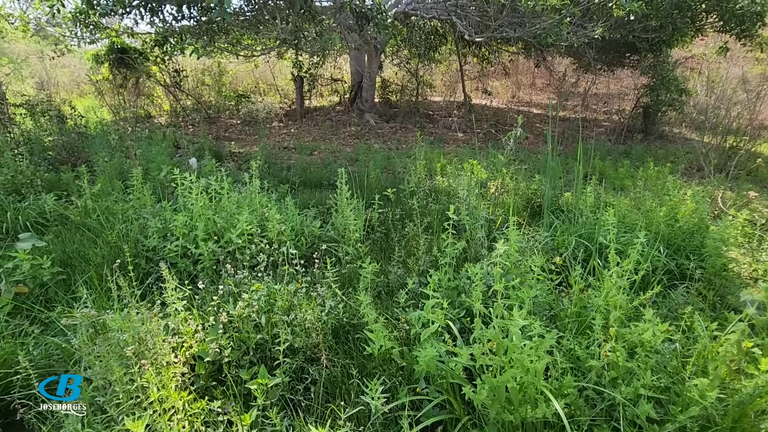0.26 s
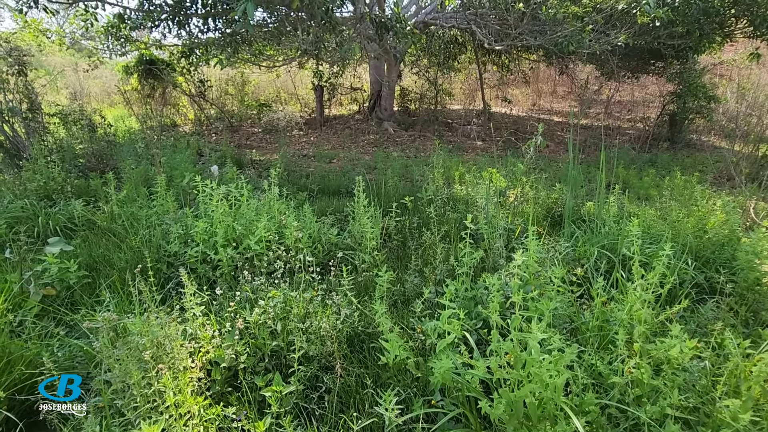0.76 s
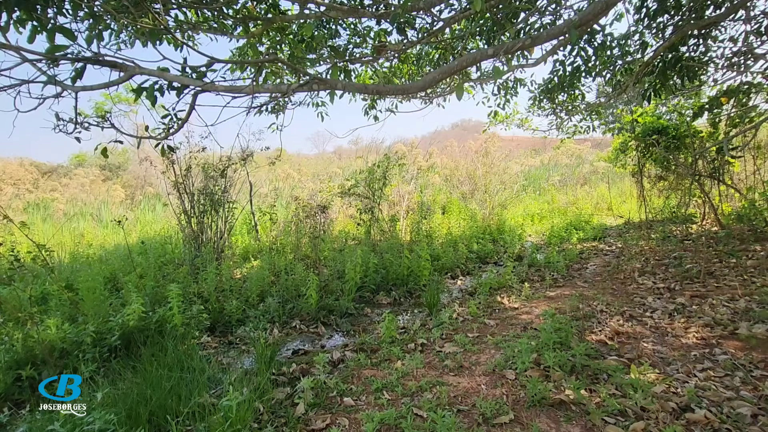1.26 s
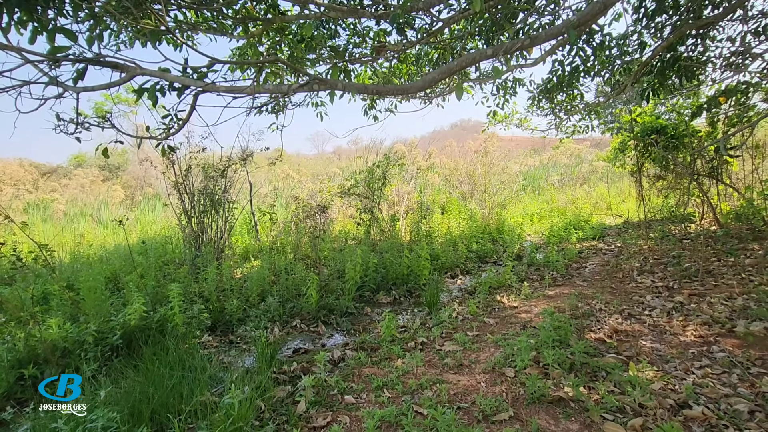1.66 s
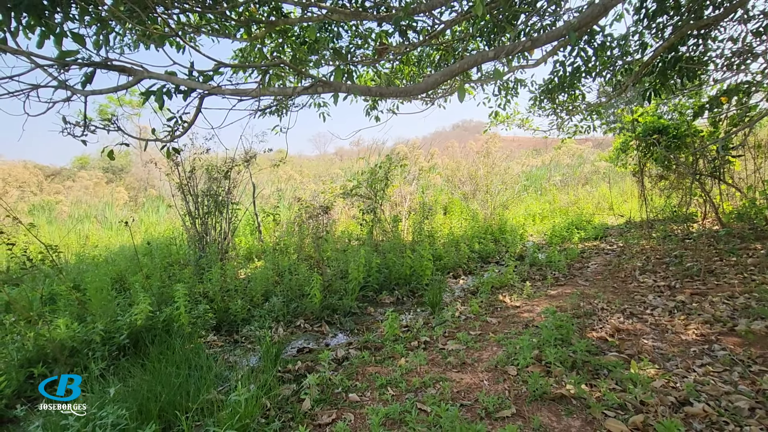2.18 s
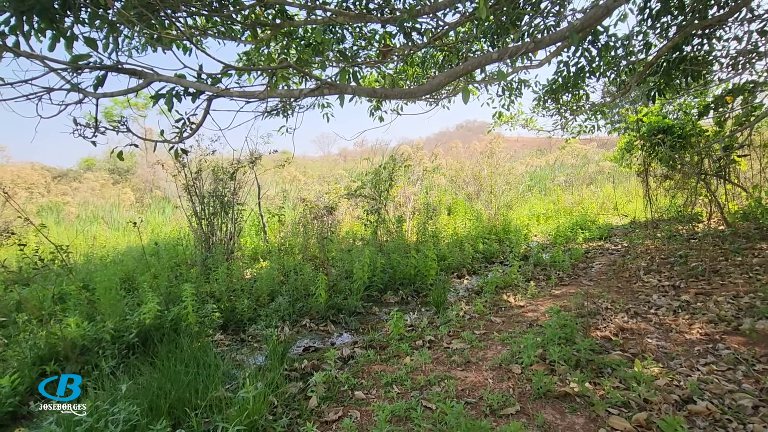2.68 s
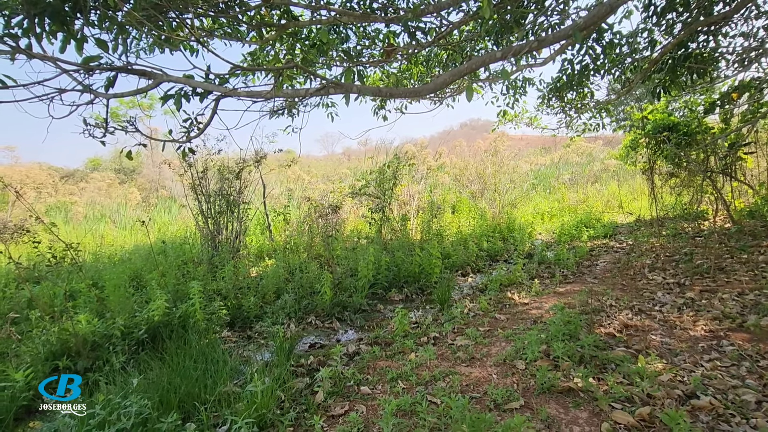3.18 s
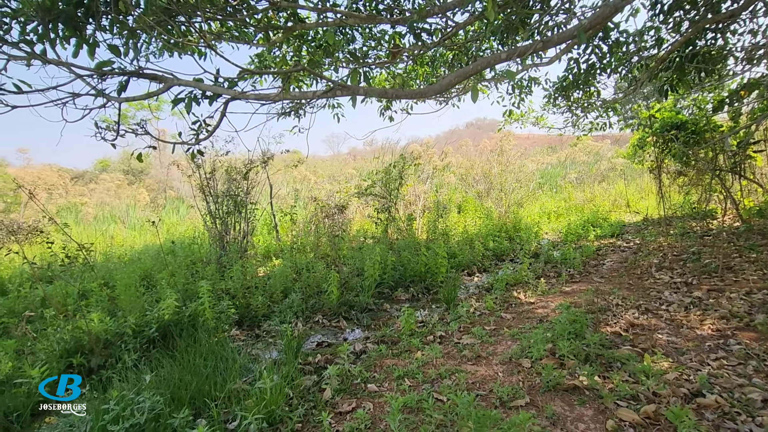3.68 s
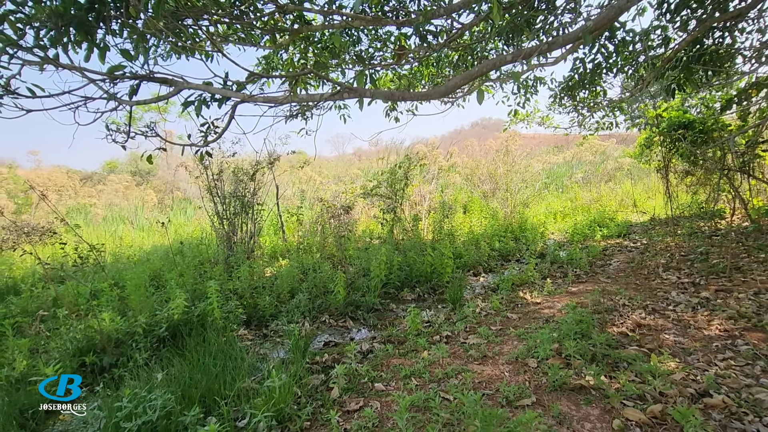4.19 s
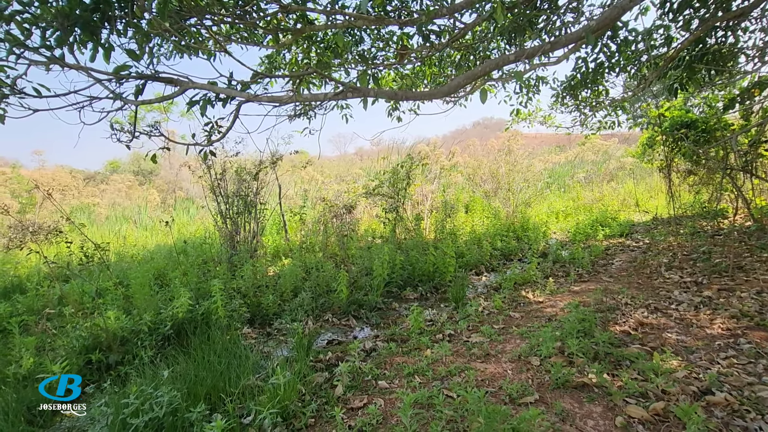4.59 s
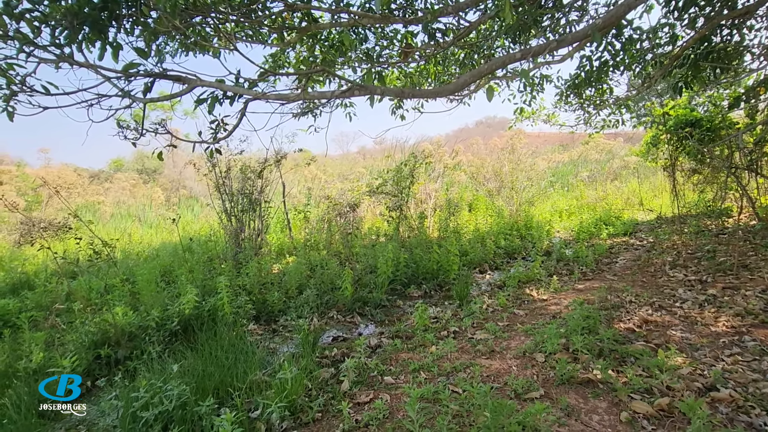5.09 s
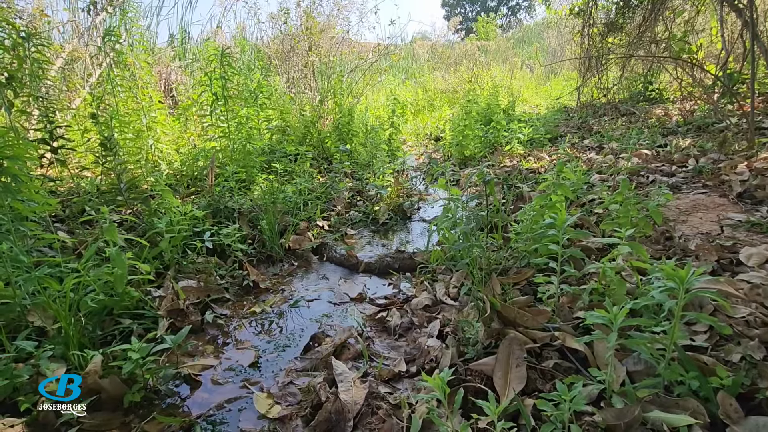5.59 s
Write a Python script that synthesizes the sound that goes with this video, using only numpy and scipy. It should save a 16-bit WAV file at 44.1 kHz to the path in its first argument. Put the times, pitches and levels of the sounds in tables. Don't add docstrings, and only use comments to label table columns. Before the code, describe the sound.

Three abrupt outdoor shots share a continuous cricket chorus. First, trills with climbing starts sound over a far road rumble and soft wind buffeting. Next, quieter ground noise exposes a piercing, almost continuous high cricket, clear trills from the left and a rougher chirper near the centre, with scattered leaf crackles to the right. Finally, close by wet ground, twigs tick, leaves crunch and a foot thuds into mud with tiny bubbles. Open air, wide stereo camera microphone.

```python
import sys
import numpy as np
from scipy import signal
from scipy.fft import rfft, irfft, next_fast_len
from scipy.io import wavfile
from scipy.ndimage import uniform_filter1d, map_coordinates

SR = 44100
rng = np.random.default_rng(int(sys.argv[2]) if len(sys.argv) > 2 else 0)


def attenuation_scalar(level_db):
    decades = np.asarray(level_db, float) / 20
    return 10 ** decades


def pcm_store(signal):
    levels = np.round(np.clip(np.atleast_2d(signal), -1, 1) * 32767)
    wavfile.write(sys.argv[1], SR, levels.astype(np.int16).T)


N = 257984
TIME = np.arange(N) / SR

CUTS = [0, 1.292, 5.288, 5.86]
HIGH_RATE = (62.84, 62.74)
HIGH_STARTS = (.0189, 1.3148, 3.5462, 4.3432)
HIGH_LENGTHS = (2.223, .789, 1)
CLEAR_RATES = (38, 35.3)
DOUBLE_RATE = 31.3


def unit(x):
    return x / np.sqrt(np.mean(x ** 2) + 1e-20)


def along(points, hz):
    f, v = np.transpose(points)
    return np.interp(np.log(hz + 1), np.log(f + 1), v)


def curves(rows):
    s, *columns = np.transpose(rows)
    return [np.interp(TIME, s, column) for column in columns]


def wobble(rate):
    return map_coordinates(rng.standard_normal(size=4000), [TIME * rate])


def filtered(x, response):
    m = next_fast_len(x.shape[-1] + 8192)
    return irfft(rfft(x, m) * response(np.fft.rfftfreq(m, 1 / SR)), m)[..., :x.shape[-1]]


def sides(pan_db):
    left, right = attenuation_scalar(pan_db / 2), attenuation_scalar(-pan_db / 2)
    return np.sqrt(2) * np.array([left, right]) / np.hypot(left, right)


def lagged(pair, lag):
    return np.array([np.roll(pair[0], round(lag)), pair[1]])


def rush(spectrum, alike, patchy_db, size=N):
    z = signal.stft(rng.standard_normal((2, size + 512)), nperseg=512)[2]
    field = uniform_filter1d(rng.standard_normal(z.shape[1:]), size=5, axis=0)
    field = uniform_filter1d(field, size=8, axis=1)
    pair = signal.istft(z * attenuation_scalar(patchy_db * unit(field)), nperseg=512)[1][:, :size]

    def response(hz):
        coherence = along([(100, 0.91), (900, alike), (4000, alike / 2)], hz)
        angle = np.arccos(np.clip(coherence, 0, 1)) / 2
        return attenuation_scalar(along(spectrum, hz)) * [np.cos(angle), np.sin(angle)]

    mid, side = filtered(pair, response)
    return unit(np.array([mid + side, mid - side]))


def swells(rows, rest_db):
    gain = attenuation_scalar(rest_db)
    for s, db, rise, fall in rows:
        distance = np.maximum((s - TIME) / rise, (TIME - s) / fall)
        gain = gain + attenuation_scalar(db - 25 * distance.clip(0, 8))
    return gain


def shot(s):
    return int(np.searchsorted(CUTS, s)) - 1


def stop(s, length):
    return min(s + length, CUTS[shot(s) + 1] - .006, TIME[-1])


def phrases(singers):
    rows = []
    for (rate, hz, sag, pan_db, turn), songs in singers:
        for s, length, db in songs:
            since = s - CUTS[shot(s)]
            rows.append((s, stop(s, length), rate, hz - sag * since, db, pan_db + turn * since, 0))
    return rows


def trill(rows, duty, arch_hz, slope_hz, dip, lean, scatter_db, loose_hz, octave_db):
    out = np.zeros((2, N))
    drift_hz = 14 * wobble(1.3)
    for first, end, rate, hz, db, pan_db, climb_hz in rows:
        last_edge = first + (np.floor((end - first) * rate) + .5) / rate
        span = slice(max(0, round((first - .5 / rate) * SR)), round(last_edge * SR))
        t = TIME[span] - first
        stroke = np.floor(t * rate + .5).astype(int).clip(0)
        size, phase, detune = rng.standard_normal((400, 3))[stroke].T
        u = np.clip((t * rate - stroke) / duty, -.5, .5)
        shape = np.cos(np.pi * u) ** 0.5 * (1 - dip * np.exp(-(u / 0.16) ** 2)) * np.exp(-lean * u)
        pitch = hz + drift_hz[span] + arch_hz * np.cos(2 * np.pi * u) / 2
        pitch += loose_hz * detune - slope_hz * u
        cold = np.exp(-(t / .09) ** 2)
        pitch -= climb_hz * cold
        shape *= attenuation_scalar(-.045 * climb_hz * cold)
        angle = 2 * np.pi * np.cumsum(pitch) / SR + phase * loose_hz / 12
        tone = unit(shape * (np.sin(angle) + attenuation_scalar(octave_db) * np.sin(2 * angle)))
        out[:, span] += attenuation_scalar(db + scatter_db * size) * tone * sides(pan_db)[:, None]
    return out


def ground_noise(k, t, gust, alike, lag):
    # f/Hz, density/dB
    ground = [
        [(13, -55), (22, -20), (49, -3), (69, -0.5), (190, -13.5), (241, -28), (366, -24), (498, -17.5),
         (863, -11.5), (1230, -27), (1630, -30), (3230, -40.5), (3850, -42), (4200, -37), (5460, -70),
         (9240, -120)],
        [(13, -24), (22, 3.5), (53, -2), (86, -1), (146, -6.5), (328, -20.5), (418, -15), (1080, -20.5),
         (1950, -17), (3520, -24), (4200, -24.5), (5460, -64), (9240, -120)],
        [(13, -33), (22, 7.5), (107, 2), (149, 2), (221, -5), (328, -4.5), (409, -6.5), (985, -11),
         (1710, -9.5), (1860, -7), (4200, -14), (5460, -48), (9240, -120)],
    ]
    rumble = [
        (-48, -0.23),
        (-66, -0.4),
        (-65, 8.5),
    ]
    start_db, drift_db = rumble[k]
    noise = lagged(rush(ground[k], alike, patchy_db=2.0, size=len(t)), lag)
    return attenuation_scalar(start_db + drift_db * (t - CUTS[k])) * gust * noise


def far_chorus(k, size, level_db, pan_db):
    # f/Hz, density/dB
    chorus = [
        [(2350, -74), (4000, -49), (4180, -41), (4600, -29), (5260, -39), (5840, -6.5), (6080, -14),
         (6430, -2.5), (7370, -27), (8620, -5), (9700, -14.5), (12600, -47), (21300, -120)],
        [(2350, -40), (4000, -35), (4670, -25), (5180, -82), (5520, -15.5), (6380, 2.5), (6700, 0.5),
         (7480, -18.5), (8870, -5.5), (9520, 8.5), (9700, -5), (12600, -63), (21300, -120)],
        [(2350, -44), (4000, -38), (4620, -3), (5630, -32), (5970, 3), (6380, 6), (6850, 2), (7480, -7.5),
         (9700, -13), (12600, -54), (21300, -120)],
    ]
    # f/Hz, gain/dB
    thin = [(7600, 0), (8000, -5), (9300, -6), (9650, -60)]
    noise = rush(chorus[k], 0.051, patchy_db=2.0, size=size)
    return filtered(attenuation_scalar(level_db - 1.5) * noise * sides(pan_db)[:, None], lambda hz: attenuation_scalar(along(thin, hz)))


def breeze():
    # t/s, level/dB, build-up/s, release/s
    buffet = [(.02, -40, .3, 0.56), (.6, -44, 0.55, 0.11), (1.09, -45, 1, 0.43), (1.56, -75, 0.26, 0.17),
              (3.7, -68, 0.35, 0.36), (4.01, -50, 0.11, 0.3), (4.43, -52, 0.19, 0.065),
              (4.9, -57, 0.87, 0.33), (5.15, -44.5, 0.19, 0.43), (5.6, -60, 0.077, 0.45)]
    spectrum = [(15, -13.5), (28, -6.5), (50, -12.0), (90, -13), (200, -56)]
    return attenuation_scalar(-13.0) * swells(buffet, rest_db=-92) * rush(spectrum, 0.87, patchy_db=-3.5)


def grass_insects():
    # f/Hz, density/dB
    hiss = [(10500, -90), (11000, -11.5), (11600, -4.5), (12500, 0), (14000, -0.5), (15700, -3)]
    # t/s, level/dB, left-right/dB
    sizzle = [(0, -73, 30), (3.8, -71.5, 39), (5.15, -80.5, 48), (5.85, -74, 22)]
    hiss_db, pan_db = curves(sizzle)
    return attenuation_scalar(hiss_db + 10.5) * rush(hiss, 0.18, patchy_db=2.2) * sides(pan_db) * (TIME < CUTS[2])


def engine():
    hum = np.sin(2 * np.pi * np.cumsum(63 + 2.44 * wobble(6.0)) / SR)
    return hum * attenuation_scalar(-52 + 3.5 * wobble(9.6)) * (TIME < CUTS[1])


def low_singers():
    # first stroke t/s, length/s, f/Hz, level/dB
    low = [(0.697, 0.38, 4584, -42), (1.507, 0.48, 4653, -55), (2.588, 0.23, 4780, -58),
           (2.6984, 0.45, 4653, -53), (3.8514, .43, 4680, -50.5), (5.0161, .4, 4720, -50)]
    # first stroke t/s, length/s, level/dB
    low_tail = [(0.918, 0.16, -48), (1.1, 0.33, -51), (1.319, 0.19, -63.5), (2.0135, 0.39, -60.5),
                (3.2235, 0.5, -61.5), (4.2936, 0.3, -59.5), (5.7916, .1, -62)]
    # first stroke t/s, length/s, f/Hz, level/dB
    falling = [
        (-.004, .21, 4660, -48),
        (.232, .05, 4690, -56),
    ]
    low_rates = (51.75, 51.05, 51)
    tail_rates = (50.2, 51.3, 51)
    pan_db, climb_hz, tail_hz = 2.5, 300.8, 4700
    rows = [(s, stop(s, d), low_rates[shot(s)], hz, db, pan_db, climb_hz) for s, d, hz, db in low]
    rows += [(s, stop(s, d), tail_rates[shot(s)], tail_hz, db, pan_db, 0) for s, d, db in low_tail]
    early = trill([row for row in rows if row[0] < CUTS[1]], duty=.72, arch_hz=149.4, slope_hz=-350,
                  dip=0.03, lean=-0.27, scatter_db=1.0, loose_hz=12, octave_db=-17)
    late = trill([row for row in rows if row[0] > CUTS[1]], duty=.68, arch_hz=151.7, slope_hz=-30,
                 dip=0.03, lean=0.01, scatter_db=1.0, loose_hz=13, octave_db=-13)
    falls = [(s, s + d, tail_rates[0], hz, db, pan_db, 0) for s, d, hz, db in falling]
    sliding = trill(falls, duty=.8, arch_hz=179, slope_hz=520,
                    dip=0.03, lean=1.3, scatter_db=0.5, loose_hz=14, octave_db=-14)
    return early + late + sliding


def far_singers():
    # first stroke t/s, length/s, f/Hz, level/dB
    songs = [(0.006, .16, 6200, -48.5), (0.022, .18, 5930, -52.5), (0.1876, .5, 6220, -42.5),
             (.3598, .2, 6840, -55), (0.7047, .55, 6080, -45), (0.966, .33, 6230, -47.5),
             (1.031, .24, 6780, -57), (1.3303, .22, 6480, -49.5), (1.4455, .57, 6275, -51),
             (1.623, .67, 6380, -59), (2.056, .54, 6120, -53.5), (2.418, .45, 6350, -49),
             (3.008, .77, 6100, -56), (3.203, .6, 6370, -48), (4.1156, .63, 6360, -49),
             (4.1429, .62, 6080, -54.5), (5.0615, .6, 6100, -62), (5.114, .6, 6400, -47),
             (5.315, .6, 6620, -55.5), (5.3308, .6, 6130, -60.5), (5.46, .6, 5760, -62.5)]
    rates = (32.3, 31.7, 32.4, 38.2, 32, 32.2, 30, 33.7, 33.2, 31, 32.95, 33.85, 33.1, 33.75, 34.2, 32.35,
             31.5, 33.8, 30.5, 31.5, 31.5)
    bearings = [11, 7.5, -8]
    rows = [(s, stop(s, d), rate, hz, db, bearings[shot(s)], 0) for rate, (s, d, hz, db) in zip(rates, songs)]
    return trill(rows, duty=.6, arch_hz=149.6, slope_hz=31.0,
                 dip=0.17, lean=0.11, scatter_db=-0.5, loose_hz=13.8, octave_db=-19.5)


def high_singer():
    # t/s, length/s, level/dB
    high_songs = [
        ((HIGH_RATE[0], 8740, 0, 3.5, 0), [(HIGH_STARTS[0], 1.3, -59)]),
        ((HIGH_RATE[1], 8720, 65, 10, 0), [(HIGH_STARTS[1], HIGH_LENGTHS[0], -49), (HIGH_STARTS[2], HIGH_LENGTHS[1], -49), (HIGH_STARTS[3], HIGH_LENGTHS[2], -49)]),
    ]
    # t/s, change/dB, left-right/dB
    turning = [(0, -9, 0), (1.29, -11, 3), (1.3, 5, 0.5), (3.26, 2.5, 4.5), (4.11, 0.7, 2.5), (5.28, 1, 15)]
    change_db, pan_db = curves(turning)
    high = trill(phrases(high_songs), duty=.7, arch_hz=1097, slope_hz=400,
                 dip=0.96, lean=0, scatter_db=0.4, loose_hz=11.1, octave_db=-46)
    high = filtered(high, lambda hz: along([(9450, 0.89), (9800, .001)], hz))
    return high * attenuation_scalar(change_db) * sides(pan_db) / sides(3.2)[:, None]


def clear_singer():
    # t/s, length/s, level/dB
    clear_songs = [
        ((CLEAR_RATES[0], 6570, 4.4, 21, 7.7), [(.2018, 0.36, -45), (.9609, 0.37, -47.5)]),
        ((CLEAR_RATES[1], 6610, 7.8, 15.3, -3.2), [(1.3028, 0.32, -58), (1.8116, 0.6, -49.5), (2.6625, 0.51, -45.5), (3.4822, .59, -46), (4.3588, 0.56, -45.5), (5.201, 0.16, -47.5)]),
    ]
    return trill(phrases(clear_songs), duty=.55, arch_hz=107.7, slope_hz=29,
                 dip=0, lean=-0.16, scatter_db=-1.5, loose_hz=7.2, octave_db=-20.0)


def double_singer():
    # t/s, length/s, level/dB
    double_songs = [((DOUBLE_RATE, 5690, 21, 0.66, -1.1), [(1.3151, .155, -56.5), (1.8571, 0.58, -58.5),
                    (2.8763, .6, -51.5), (3.8366, .57, -50), (4.7972, 0.68, -49.5)])]
    return trill(phrases(double_songs), duty=.58, arch_hz=220.5, slope_hz=30.3,
                 dip=0.74, lean=0.87, scatter_db=0.5, loose_hz=9.1, octave_db=-25.5)


def crickets():
    # f/Hz, gain/dB
    dark = [(9500, 0), (9750, -45), (10850, -45), (11050, 0)]
    low, far, high = low_singers(), far_singers(), high_singer()
    near = np.where(TIME < CUTS[1], lagged(high, -5), lagged(high, -24))
    near = near + lagged(clear_singer(), -12.5) + attenuation_scalar(2.0) * lagged(double_singer(), -13)
    direct = attenuation_scalar(-1.88) * near + attenuation_scalar(-2.0) * lagged(low, -7) + attenuation_scalar(-1.5) * lagged(far, -9.0)
    distant = attenuation_scalar(-15) * near + attenuation_scalar(-6.5) * high + attenuation_scalar(-10.5) * low + attenuation_scalar(-10.0) * far
    return filtered(np.array([direct, distant]), lambda hz: attenuation_scalar(along(dark, hz)))


def scattered(x, t60):
    t = np.arange(SR // 4) / SR
    tail = rng.standard_normal((2, len(t))) * attenuation_scalar(-60 * t / t60) * (t > .002)
    return signal.fftconvolve(x, tail / np.linalg.norm(tail[0]), axes=1)[:, :x.shape[1]]


def leaf_crackle():
    # t of most strain/s, level/dB, build-up/s, release/s
    rustle = [(1.41, -73.5, 0.43, 0.13), (1.68, -56, 0.019, 0.047), (1.76, -57, 0.065, 0.13),
              (2.37, -58, 0.012, 0.078), (2.57, -72, 0.08, 0.078), (2.94, -64.5, 0.25, 0.34),
              (3.22, -52, 0.062, 0.043), (3.79, -51.5, 0.16, 0.091), (3.85, -53, 0.01, 0.016),
              (4.18, -73, 0.078, 0.13), (4.49, -73, .02, 0.15), (5.32, -65, 0.14, 0.32),
              (5.63, -88, 0.37, .3), (5.772, -52, 0.22, 0.09)]
    # f/Hz, density/dB
    leaf = [(700, -57), (1300, -3), (2000, -1), (4000, 5.5), (7000, 10.5), (10500, -7.5), (15700, -9)]
    strain = swells(rustle, rest_db=-88) * (TIME > CUTS[1])
    alike = .8
    grains = alike * rng.standard_normal(N) + (1 - alike) * rng.standard_normal((2, N))
    grains = grains * attenuation_scalar(4.5 * wobble(500))
    crackle = unit(filtered(grains, lambda hz: attenuation_scalar(along(leaf, hz))))
    return lagged(attenuation_scalar(6.5) * strain * crackle * sides(-10)[:, None], 15)


def snaps():
    # t/s, peak level/dB, ring f/Hz, brightness/dB
    dry_snaps = [(1.3885, -55.5, 1730, -7), (1.5253, -62, 3840, -3), (1.6687, -44.5, 4350, 3),
                 (1.7418, -43.5, 1630, -25), (1.7881, -45, 2450, -26), (1.9593, -57, 2330, 7),
                 (2.0401, -60.5, 3800, -4), (2.361, -48, 1710, -9), (2.534, -60, 2000, -5),
                 (2.566, -51, 3540, -7), (2.6602, -56.5, 2060, -19), (2.7076, -62, 1990, 1),
                 (2.9017, -54, 3460, -7), (3.143, -60, 3780, -11), (3.1793, -54, 3670, -19),
                 (3.2115, -48.5, 7460, 4), (3.2828, -52.5, 4850, 13), (3.6942, -52, 2200, 7),
                 (3.7322, -54, 3950, 13), (3.75, -45.5, 3550, 8), (3.772, -44, 4120, 6),
                 (3.7952, -43.5, 3160, 7.5), (3.845, -47, 3850, 8), (3.9333, -51, 4000, -5),
                 (4.1838, -44.5, 4150, -35), (4.891, -61, 3130, -21),
                 (1.752, -59, 2500, -10), (2.3635, -54, 2600, -5), (2.368, -53, 3900, -5),
              (2.380, -50, 4400, -5), (2.391, -54.5, 3000, -5), (2.570, -54, 2500, -5),
              (3.2133, -47, 4150, 12), (3.217, -50.5, 2800, 9), (3.72, -57, 4150, 0),
              (3.783, -55, 6000, 14), (3.805, -53, 3000, 0), (3.853, -57, 3050, -4)]
    # t/s, peak level/dB, ring f/Hz
    crushed = [(5.305, -55.5, 2170), (5.3218, -42.5, 3640), (5.498, -55, 2430), (5.5119, -52, 1770),
               (5.5751, -51.5, 2900), (5.6044, -42.5, 3530), (5.6815, -40.5, 2230), (5.6852, -37.5, 5170),
               (5.7307, -38, 2100), (5.7355, -42, 2100), (5.776, -38, 2570)]
    # t/s, peak level/dB, left-right/dB
    ticks = [(5.2992, -52, 6.0), (5.3227, -46, 9.0), (5.39, -49, -1.0), (5.4115, -53, -1.5),
             (5.436, -61, 8.0), (5.4489, -50, 9.5), (5.4646, -44, 1.5), (5.5118, -43.5, -4),
             (5.5432, -54, 2.0), (5.605, -37.5, -4.5), (5.6622, -39, 11), (5.7225, -40, 9.0),
             (5.772, -39, 15), (5.774, -42, 9.5)]
    leaf_t60, twig_t60 = 0.063, 0.025
    events = [(*row, -20 + 14 * rng.standard_normal(), leaf_t60) for row in dry_snaps]
    events += [(*row, -24, -11, leaf_t60) for row in crushed]
    events += [(s - .001, db - 3.5, 6200, 4, pan_db, twig_t60) for s, db, pan_db in ticks]
    out, t = np.zeros((2, N + 2048)), np.arange(2048) / SR
    middle = signal.butter(2, [1300, 8000], "bandpass", fs=SR)
    top = signal.butter(2, [8000, 15500], "bandpass", fs=SR)
    for s, db, hz, bright_db, pan_db, t60 in events:
        noise = rng.standard_normal((3, len(t)))
        ring = np.sin(2 * np.pi * hz * t) * attenuation_scalar(-60 * t / 0.011)
        crack = 0.9 * noise[0] * attenuation_scalar(-60 * t / 0.0066) + 0.34 * noise[1:] * attenuation_scalar(-60 * t / t60)
        body = signal.lfilter(*middle, crack + ring)
        fizz = signal.lfilter(*top, crack)
        burst = attenuation_scalar(db + 4.5) * (body + attenuation_scalar(bright_db - 1.0) * fizz) * sides(pan_db)[:, None]
        out[:, round((s + .0012) * SR):][:, :len(t)] += burst
    return lagged(out[:, :N], 15)


def brook_fizz():
    # f/Hz, density/dB
    open_air = [(4500, -60), (6500, -6), (8500, -3), (10000, -7), (12500, 0), (15700, -2)]
    return attenuation_scalar(-67) * rush(open_air, .3, patchy_db=5.0) * (TIME > CUTS[2])


def mud():
    # t/s, level/dB, first f/Hz, last f/Hz, length/s
    bubbles = [(5.562, -59, 980, 960, 0.0061), (6.5, -61, 1130, 1400, 0.0049),
               (5.583, -65, 1000, 1050, 0.0051), (5.776, -59, 1600, 1800, 0.01),
               (5.792, -52, 1520, 1800, 0.017), (5.788, -56, 660, 1330, 0.04),
               (5.757, -56.5, 640, 530, 0.02)]
    # t/s, level/dB, first f/Hz, last f/Hz, t60/s
    thuds = [
        (5.6054, -34.5, 555, 56, 0.088),
        (5.7261, -38.5, 400, 56, 0.1),
    ]
    # t/s, peak level/dB, contact/s
    slap = (5.6052, -25.5, 0.00011)
    slap_s, slap_db, contact = slap
    out, t = np.zeros((2, N + SR)), np.arange(SR // 8) / SR
    for s, db, first_hz, last_hz, t60 in thuds:
        pitch = last_hz + (first_hz - last_hz) * np.exp(-t / 0.0013)
        thud = np.sin(2 * np.pi * np.cumsum(pitch) / SR) * attenuation_scalar(db - 60 * t / t60)
        out[:, round(s * SR):][:, :len(t)] += thud * sides(-8.0)[:, None]
    out[:, :N] -= attenuation_scalar(slap_db) * np.exp(-((TIME - slap_s) / contact) ** 2) * sides(-19.0)[:, None]
    for s, db, first_hz, last_hz, length in bubbles:
        u = np.clip(t / length, 0, 1)
        pitch = first_hz + (last_hz - first_hz) * u ** 2
        bubble = np.sin(np.pi * u ** 0.4) * np.sin(2 * np.pi * np.cumsum(pitch) / SR)
        out[:, round(s * SR):][:, :len(t)] += attenuation_scalar(db) * bubble
    return out[:, :N]


def scene():
    # chorus level/dB, chorus left-right/dB, ground likeness (0-1), ground left lag/samples
    shots = [
        (-46.5, 6, 0.76, 23.4),
        (-46, -0.5, 0.1, 1),
        (-52, 4, 0.1, 2),
    ]
    direct, distant = crickets()
    out = breeze() + grass_insects() + engine() + direct + leaf_crackle() + snaps() + brook_fizz() + mud()
    gusts = attenuation_scalar(1.7 * wobble(5.5))
    for k, (chorus_db, pan_db, alike, lag) in enumerate(shots):
        span = slice(round(CUTS[k] * SR), round(CUTS[k + 1] * SR))
        t = TIME[span]
        out[:, span] += ground_noise(k, t, gusts[span], alike, lag)
        out[:, span] += far_chorus(k, len(t), chorus_db, pan_db)
        out[:, span] += scattered(distant[:, span], t60=0.38)
    for cut in CUTS[1:3]:
        out *= np.clip(abs(TIME - cut) / 0.006, 0, 1)
    return out


def low_pass(x):
    return signal.sosfilt(signal.butter(12, 15800, fs=SR, output="sos"), x)


def record(dry):
    mix = filtered(dry, lambda hz: hz < 15800)
    return low_pass(mix)


dry = scene()
out = record(dry)
pcm_store(out)
```